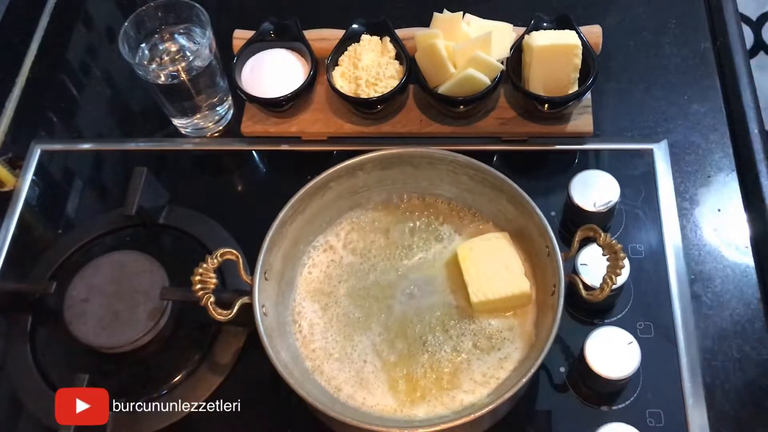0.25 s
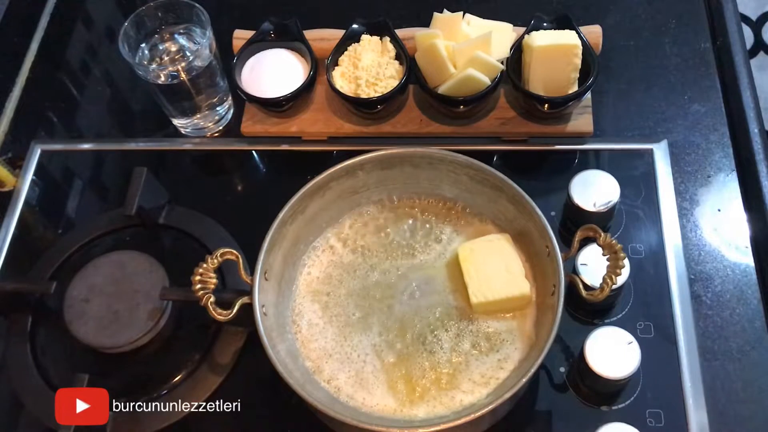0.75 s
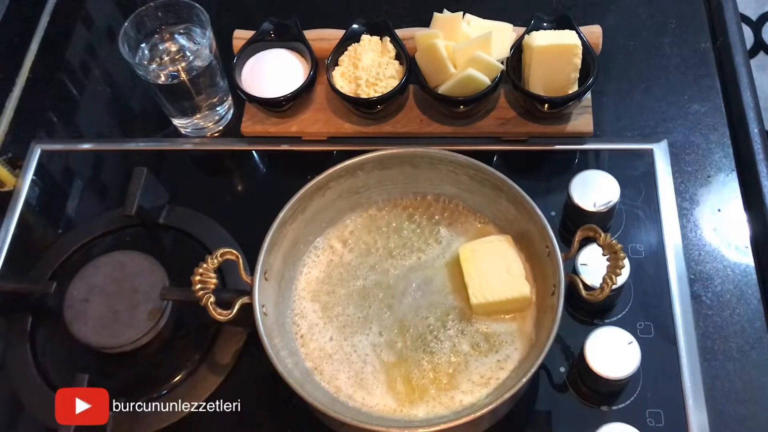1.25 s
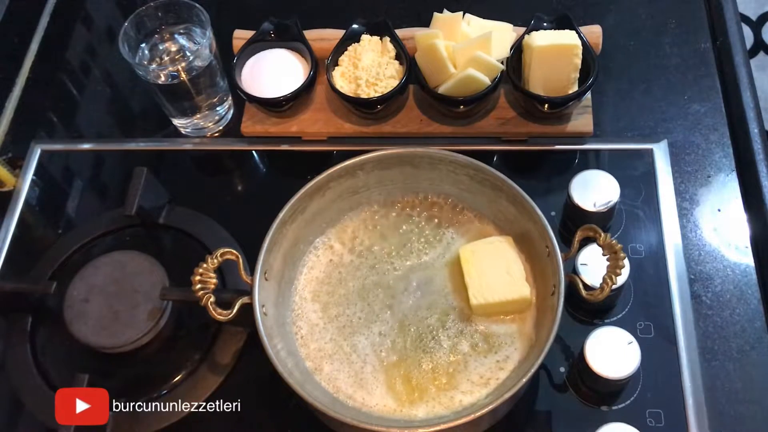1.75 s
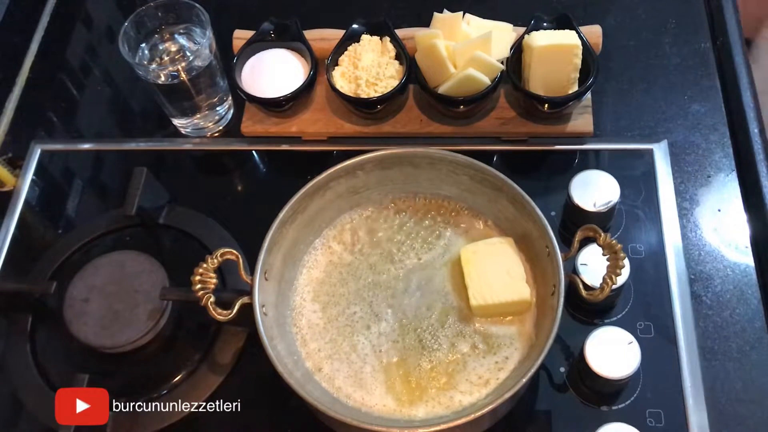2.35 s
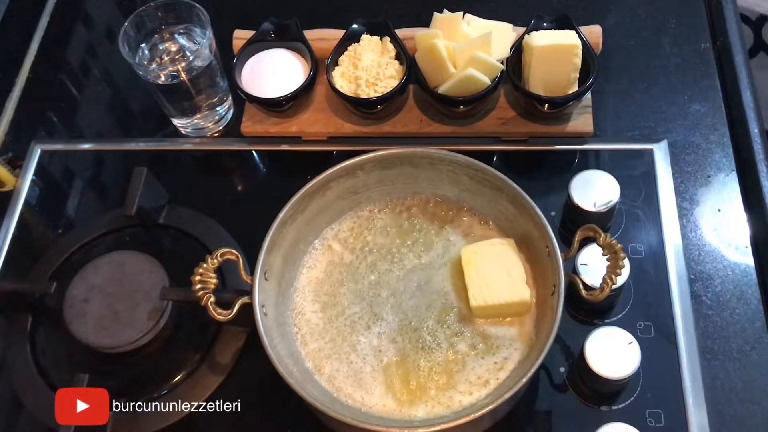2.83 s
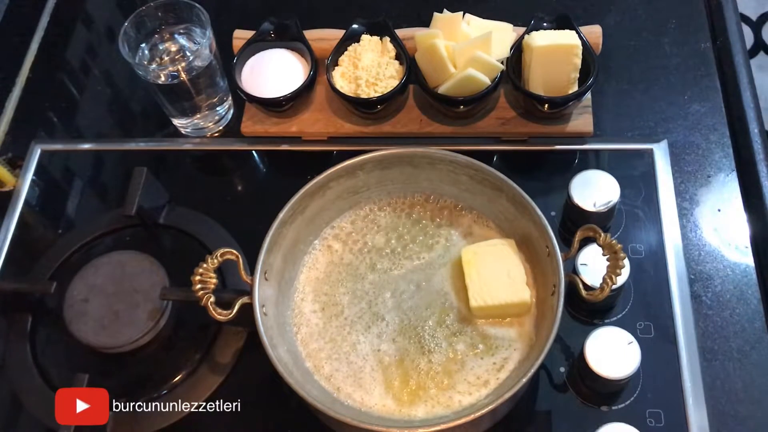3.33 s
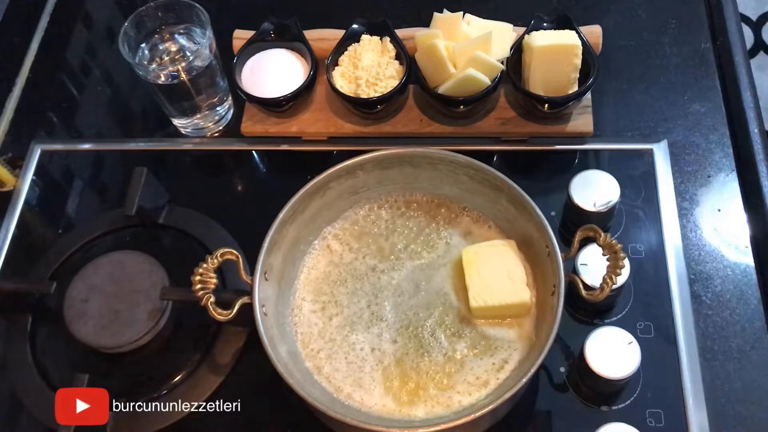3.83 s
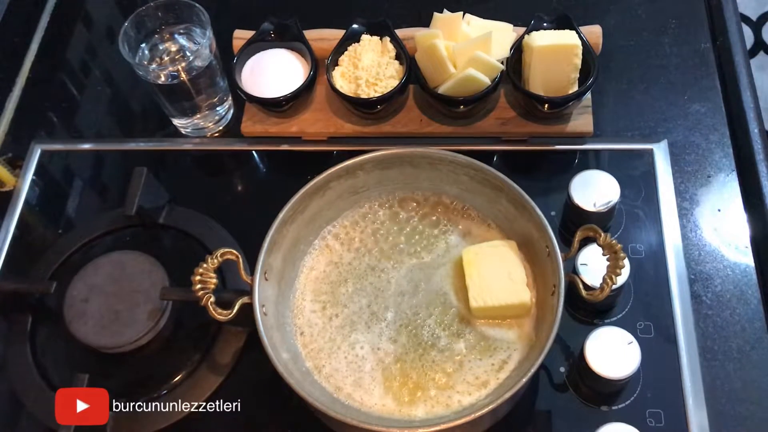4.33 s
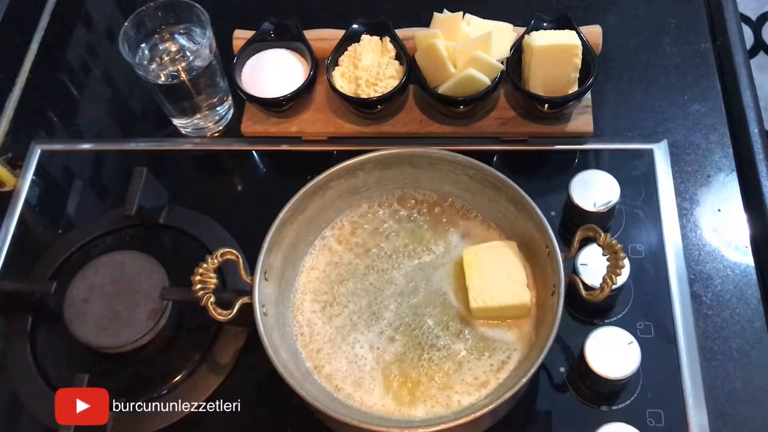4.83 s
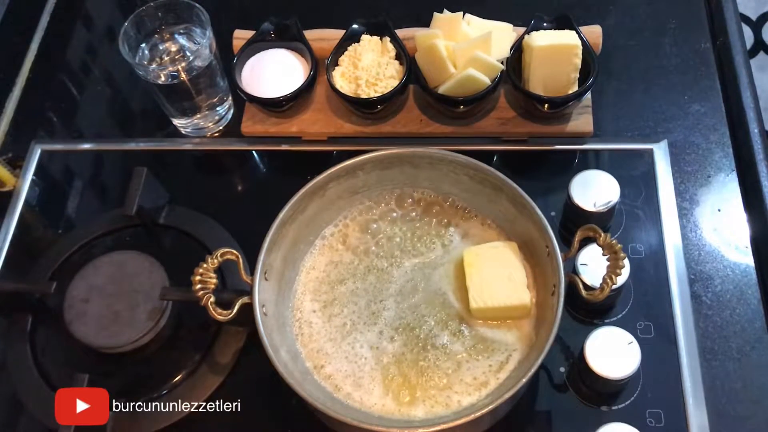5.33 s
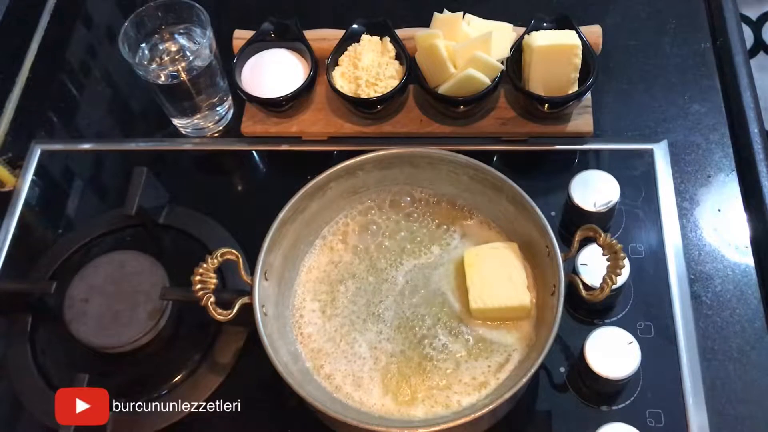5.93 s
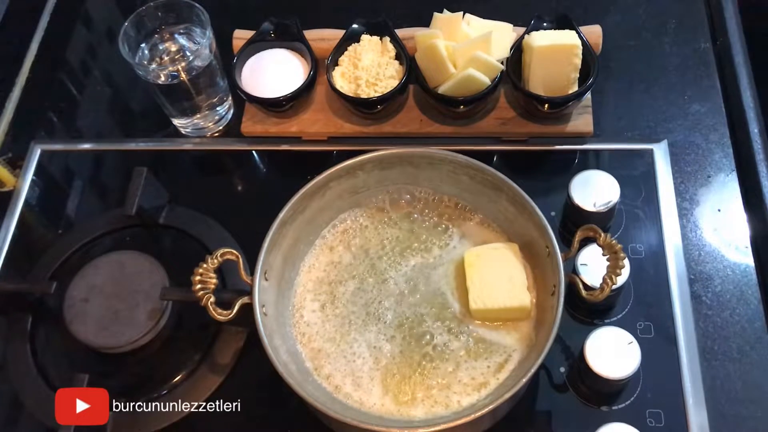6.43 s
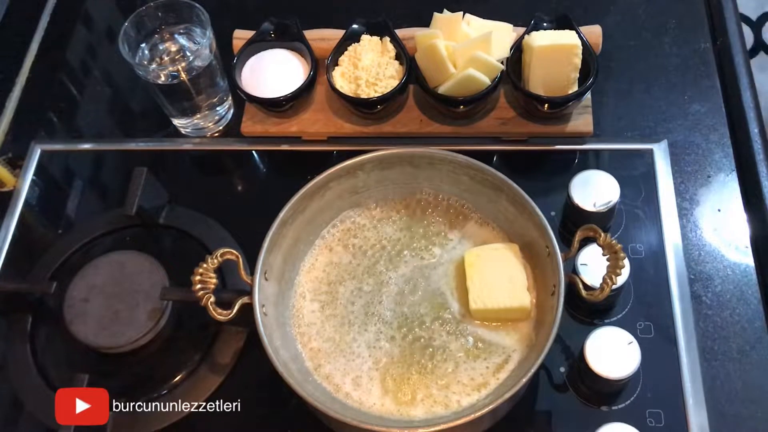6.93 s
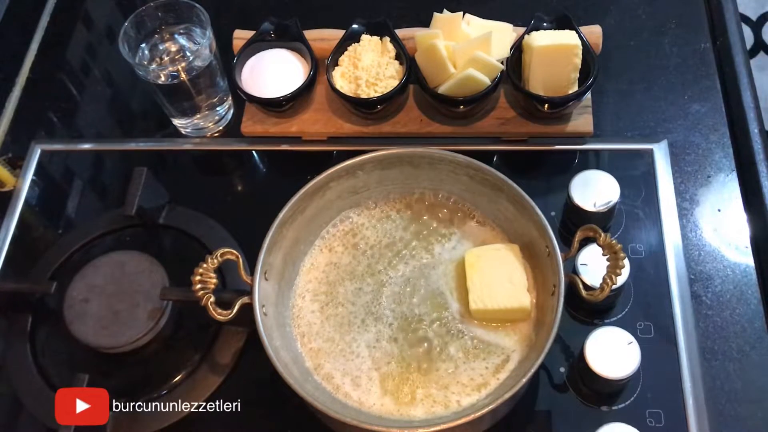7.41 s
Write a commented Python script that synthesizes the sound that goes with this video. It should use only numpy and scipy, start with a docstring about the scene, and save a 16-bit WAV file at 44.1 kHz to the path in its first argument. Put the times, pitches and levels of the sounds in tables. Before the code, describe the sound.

Butter sizzles close by in a metal pan for the whole stretch of nearly eight seconds: a fine, high fizz of tiny bubbles, with sharp, irregular pops. Beneath it the stove gives a steady low hum and a soft rush of air. Right at the start a drawer is pulled with a thud and two clacks. It rumbles on its rollers, with lighter clacks just after one second, then fades as it coasts. A faint wooden bump follows around 2.3 seconds and another at 4. At 4.4 seconds the drawer is knocked shut with a deep thud and a clatter of contents, the loudest moment, followed by a smaller knock at 4.8. Short spits of steam come now and then from two seconds on, more often between five and seven and a half. The kitchen adds only a faint echo.

```python
"""Butter sizzles in a metal pan on a kitchen hob: a fizz of countless tiny bubbles bursting.
Under it the stove hums with a soft rush of air. Right at the start, something like a drawer is
pulled with a clatter and a thud, and rolls out; later it is knocked shut. All along, larger bubbles
of water burst in the fat with sharp pops, and now and then steam squirts out in a short spit."""
import sys
import numpy as np
from scipy import signal
from scipy.fft import rfft, irfft
from scipy.io import wavfile

SR = 44100
rng = np.random.default_rng(int(sys.argv[2]) if len(sys.argv) > 2 else 0)


def file_out(sig):
    """Save sig as 16-bit WAV at sys.argv[1]."""
    # one column per channel
    cols = np.atleast_2d(sig).T
    # limit, then scale
    lim = np.clip(cols, -1, 1)
    pcm = np.round(lim * 32767).astype(np.int16)
    wavfile.write(sys.argv[1], SR, pcm)


N = 338247   # samples, about 7.7 seconds


def from_db(db):
    """Turn decibels into a number to multiply by."""
    return 10 ** (np.asarray(db) / 20)


def rms_one(x):
    """Scale a sound so that its average strength (rms) is 1."""
    return x / np.sqrt(np.mean(x ** 2) + 1e-20)


def add(out, start_s, sound):
    """Mix a sound into out, beginning at start_s."""
    i = int(np.clip(round(start_s * SR), 0, N - 1))
    out[i:i + len(sound)] += sound[:N - i]


def drift(rate_hz):
    """A smooth random wobble of typical size 1; a higher rate wobbles faster."""
    step, warm_up = 40, 2000
    r = np.exp(-2 * np.pi * rate_hz * step / SR)
    noise = rng.standard_normal(N // step + warm_up + 2)
    slow = signal.lfilter([1], [1, -2 * r, r * r], noise)[warm_up:]
    return np.interp(np.arange(N) / step, np.arange(len(slow)), rms_one(slow))


def colour(x, tone):
    """Shape a sound's lows and highs along (pitch_hz, level_db) points, then scale it to rms 1."""
    size = 8192
    hz, db = np.transpose(tone)
    grid_hz = np.maximum(np.arange(size // 2 + 1) * SR / size, 1)
    gains = from_db(np.interp(np.log(grid_hz), np.log(hz), db))
    # a minimum-phase filter: it rings after a click, never before
    cepstrum = irfft(np.log(gains))
    response = irfft(np.exp(rfft(2 * cepstrum[:size // 2], size)))
    return rms_one(signal.fftconvolve(x, response)[:N])


def keep_band(x, hz, side, order=2):
    """Keep the "low" or the "high" side of hz."""
    return signal.sosfilt(signal.butter(order, hz, side, fs=SR, output="sos"), x)


def resonate(x, hz, width_hz):
    """Make a sound ring at one pitch; a narrower width rings longer."""
    r = np.exp(-np.pi * width_hz / SR)
    feedback = [1, -2 * r * np.cos(2 * np.pi * hz / SR), r * r]
    return signal.lfilter(np.array([1, 0, -1]) * (1 - r * r) / 2, feedback, x + 1e-18)


def random_clicks(per_s, spread_db, max_spreads):
    """Clicks at random moments, many small and few large."""
    sizes = from_db(spread_db * np.minimum(rng.exponential(1, N), max_spreads))
    return (rng.random(N) < per_s / SR) * sizes * rng.choice([-1, 1], N)


# How lively the foam is as time passes: time_s, boost_db
FOAM_LIVELINESS = [(0, 3), (.5, 2), (1.5, -0.6), (2.2, 0), (4.7, -0.5), (5.7, -.3), (6.3, -0.5),
                   (7.67, 1.8)]


def liveliness_db(time_s):
    """How hard the butter bubbles; it lifts or lowers the fizz and the small pops."""
    return np.interp(time_s, *np.transpose(FOAM_LIVELINESS))


# Tone of the fizz in the pan, also used for the droplets of a spit: pitch_hz, level_db
FIZZ_TONE = [(500, -23.5), (1200, -2.5), (2700, -7.5), (3400, -4.5), (4350, -0.5), (4800, -7.5),
             (5400, -2.5), (6300, -0.5), (7500, -6), (9000, -2.5), (10400, -11.5), (12300, -7.5),
             (15500, -23)]


def fizz(level_db=-56.5, bubble_db=-1.0, sharpness=9):
    """Countless tiny bubble skins snap in flurries; some small bubbles ring, each at its own pitch."""
    flurry = from_db(4.0 * drift(14))
    snaps = random_clicks(per_s=3500 * flurry, spread_db=6.0, max_spreads=5.4)
    clicks = random_clicks(per_s=600 * flurry, spread_db=9.0, max_spreads=2.99)
    pitches_hz = np.geomspace(4200, 15000, 40)
    choice = rng.integers(0, len(pitches_hz), N)
    bubbles = sum(resonate(clicks * (choice == k), hz, hz / sharpness)
                  for k, hz in enumerate(pitches_hz))
    foam = colour(from_db(bubble_db) * rms_one(bubbles) + rms_one(snaps), FIZZ_TONE)
    return foam * from_db(level_db + liveliness_db(np.arange(N) / SR))


# The notes in the stove's hum: pitch_hz, level_db, waver_db
STOVE_HUM = [(99.56, -48.5, 1.5), (406, -89, 1), (542, -68, 0.2), (919, -81, -2)]
# Tone of the air rushing at the stove: pitch_hz, level_db
AIR_TONE = [(25, -24.5), (55, 3.5), (110, -1), (170, -9.5), (240, -16.5), (330, -15.5), (460, -21.5),
            (600, -21.5), (740, -27.5), (1150, -21), (1700, -25.5), (2080, -15), (2900, -26.5),
            (15000, -30.5)]


def stove(air_db=-53.5):
    """Mains electricity hums and a fan whines faintly over a steady rush of air."""
    t = np.arange(N) / SR
    hum = sum(np.sqrt(2) * from_db(level_db + waver_db * drift(1)) * np.sin(2 * np.pi * pitch_hz * t)
              for pitch_hz, level_db, waver_db in STOVE_HUM)
    air = keep_band(colour(rng.standard_normal(N), AIR_TONE), 19, "high")
    return hum + from_db(air_db) * air


# Tone of the drawer's rollers on their runners: pitch_hz, level_db
ROLLER_TONE = [(60, -24.5), (140, 4), (210, -9.5), (300, 2.5), (380, -11.5), (520, -5.5), (720, -17.5),
               (900, -8.5), (1200, -9), (1600, -19.5), (2300, -19), (4000, -31), (10000, -54)]


def drawer_rollers(level_db=-49, pull_until_s=1.21, fade_db_per_s=17.5):
    """Rollers rumble evenly while the drawer is pulled, then fade as it coasts to rest."""
    coasting_s = np.maximum(np.arange(N) / SR - pull_until_s, 0)
    rumble = colour(rng.standard_normal(N), ROLLER_TONE)
    return from_db(level_db - fade_db_per_s * coasting_s) * rumble


def knock(noise, start_s, level_db, rise_s, fade_s):
    """Half a second of noise that swells quickly and dies away, falling 60 dB in fade_s."""
    t = np.arange(SR // 2) / SR
    piece = noise[int(start_s * SR):][:len(t)]
    return piece * np.minimum(t / rise_s, 1) * from_db(level_db - 60 * t / fade_s)


# Sharp clacks of the things in the drawer: start_s, level_db, rise_s, fade_s, pitch_hz
DRAWER_CLACKS = [(0.033, -30.5, 0.0054, 0.24, 4900), (0.309, -30, 0.0061, 0.25, 3940),
                 (1.108, -44, 0.002, 0.17, 1110), (1.288, -37.5, 0.00095, 0.18, 1290),
                 (4.329, -45, 0.0047, 0.34, 835), (4.333, -36, 0.0055, 0.42, 4170),
                 (4.407, -32, 0.0056, 0.18, 5100), (4.412, -46, 0.0029, 0.7, 1370),
                 (4.428, -38, 0.01, 0.42, 3820), (4.759, -41, 0.0012, 0.35, 4270)]
# Tone of a clack: pitch_hz, level_db
CLACK_TONE = [(100, 8.5), (280, -16), (450, 3), (800, 2), (1300, -0.5), (2200, 0.5), (3000, -2.5),
              (3900, -2.5), (5000, -6.5), (6200, -0.5), (7500, -5), (10000, -3.5), (15500, -12)]
# Soft, dull bumps against the wood: start_s, level_db, rise_s, fade_s, pitch_hz
WOOD_BUMPS = [(0.037, -33, 0.03, 0.39, 350), (2.315, -42.5, 0.026, 1, 203), (4.0, -49, 0.01, 0.36, 453),
              (4.405, -38.5, 0.0044, 0.36, 290), (4.761, -45.5, 0.0045, 0.25, 480)]
# Tone of a bump: pitch_hz, level_db
BUMP_TONE = [(60, -4), (130, 15), (195, -2.5), (260, -6.5), (340, -1.5), (420, -12), (600, -11.5),
             (1200, -29), (4000, -16)]


def drawer_knocks(noise_db=-4.0, ring_db=-5.0, ring_width=0.45, treble_hz=8000, treble_life=0.56):
    """When the drawer jolts, its contents clatter and the wood bumps, each a short blur of noise."""
    out = np.zeros(N)
    for hits, tone in ((DRAWER_CLACKS, CLACK_TONE), (WOOD_BUMPS, BUMP_TONE)):
        noise = colour(rng.standard_normal(N), tone)
        for start_s, level_db, rise_s, fade_s, pitch_hz in hits:
            ring = rms_one(resonate(noise, pitch_hz, ring_width * pitch_hz))
            hit = from_db(noise_db) * noise + from_db(ring_db) * ring
            for side, life in (("low", 1), ("high", treble_life)):   # the treble dies sooner
                band = keep_band(hit, treble_hz, side, order=3)
                add(out, start_s, knock(band, start_s, level_db, rise_s, fade_s * life))
    return out


# Thuds on the cabinet: start_s, level_db, contact_s
CABINET_THUDS = [(0.039, -20.5, 0.0076), (0.321, -35, 0.0039), (3.973, -34.5, 0.0092), (4.012, -29, 0.0075),
                 (4.406, -6, 0.0038), (4.461, -21, 0.0074), (4.767, -23, 0.0073), (4.805, -34, 0.0063),
                 (6.464, -29.5, 0.021)]
# The low notes its panels ring at: pitch_hz, level_db, fade_s (time to fall 60 dB)
PANEL_NOTES = [(49.8, -8.5, 0.47), (59, 12.5, 0.13), (75.1, 5.5, 0.26), (111.6, -0.5, 0.23),
               (134.5, -16, 0.57), (196, -24, 0.26), (262, -14.5, 0.12), (322, -22, 0.17)]


def cabinet_thuds(swell_s=0.028):
    """Each thud swells through the panels; a longer contact leaves only the lowest notes."""
    out, t = np.zeros(N), np.arange(SR // 2) / SR
    panels = sum(from_db(level_db - 60 * t / fade_s) * np.sin(2 * np.pi * pitch_hz * t)
                 for pitch_hz, level_db, fade_s in PANEL_NOTES)
    panels *= 1 - np.exp(-t / swell_s)
    for start_s, level_db, contact_s in CABINET_THUDS:
        push = np.sin(np.pi * np.minimum(t / contact_s, 1)) ** 2
        add(out, start_s, from_db(level_db) * signal.fftconvolve(panels, push / push.sum()))
    return keep_band(out, 45.0, "high", order=3)


def small_pops(per_s=14):
    """Small bubbles burst at random, each with its own size, pitch and snap; rows as in LOUD_POPS."""
    wait, size, pitch, snap = rng.uniform(-1, 1, (200, 4)).T
    start_s = np.cumsum(-np.log((1 - wait) / 2)) / per_s
    level_db = -33 + liveliness_db(start_s) + 3.5 * size
    pitch_hz = 8200 * 2 ** (0.69 * pitch)   # up to 0.69 octaves either way
    snap_db = -45 + 9 * snap
    rows = np.transpose([start_s, level_db, pitch_hz, snap_db])
    return rows[start_s < N / SR]


# The loudest bubbles of water bursting in the fat: start_s, level_db, pitch_hz, snap_db
LOUD_POPS = [(0.242, -23.5, 6300, -45), (0.53, -29, 4680, -32), (0.616, -20.5, 11700, -50),
             (0.6415, -27.5, 6570, -30.5), (0.838, -26, 6700, -46), (0.8653, -22.5, 6800, -43),
             (1.264, -20.5, 5260, -44), (1.867, -48, 12100, -24.5), (2.09, -21, 5700, -70),
             (2.115, -23, 8650, -54), (2.1714, -22, 5270, -59), (2.342, -29, 10100, -38),
             (2.531, -26, 6160, -55), (2.5425, -30, 5660, -33), (2.785, -24, 5530, -52),
             (2.8646, -27.5, 4500, -55), (3.185, -25.5, 8500, -54), (3.264, -30, 4410, -37),
             (3.291, -31, 6300, -33), (3.5402, -29, 14000, -52), (3.5537, -25, 6500, -48),
             (3.693, -25.5, 6310, -40), (3.7376, -21.5, 5100, -36), (4.0527, -35, 13500, -32),
             (4.1919, -24.5, 8700, -49), (4.5817, -18, 5700, -60), (4.76, -23.5, 4420, -60),
             (5.015, -20, 4240, -33), (5.104, -27, 4500, -38), (5.452, -39, 11000, -30),
             (5.642, -26.5, 5330, -52), (5.7279, -26.5, 5070, -52), (5.9963, -25, 6100, -57),
             (6.012, -22, 5700, -54), (6.0424, -25.5, 6200, -51), (6.1184, -25, 5770, -35),
             (6.1852, -23.5, 9450, -53), (6.2417, -24.5, 5960, -53), (6.3442, -25, 8900, -37),
             (6.404, -26, 7260, -46), (6.6749, -42, 11800, -31.5), (6.7999, -28, 7300, -53),
             (6.954, -22.5, 4450, -33), (6.998, -32, 8450, -34), (7.6047, -23, 6860, -35)]


def pops(ring_cycles=9, tail_cycles=36, ring_db=-3.0, tail_db=-13.0, snap_boost_db=9.5, echo_db=-7.0):
    """A bubble's skin snaps, the hollow rings briefly, and the hob echoes it a moment later."""
    out, t = np.zeros(N), np.arange(SR // 100) / SR
    snap = np.sin(2 * np.pi * 12500 * t) * from_db(-60 * t / .0005)
    bubbles = [*LOUD_POPS, *small_pops()]
    echo_delays_s = rng.uniform(.0027, .003, len(bubbles))
    for (start_s, level_db, pitch_hz, snap_db), delay_s in zip(bubbles, echo_delays_s):
        cycles = t * pitch_hz
        fade = from_db(ring_db - 60 * cycles / ring_cycles)
        fade += from_db(tail_db - 60 * cycles / tail_cycles)
        ring = from_db(level_db) * fade * np.sin(2 * np.pi * cycles)
        pop = keep_band(ring, 3340, "high") + from_db(snap_db + snap_boost_db) * snap
        add(out, start_s + .0006, pop)
        add(out, start_s + delay_s, from_db(echo_db) * pop)
    return out


# Spits of steam, each timed at its strongest moment: peak_s, level_db, pitch_hz
STEAM_SPITS = [(2.157, -46.5, 5500), (2.789, -50.5, 6020), (3.71, -46, 5960), (5.032, -45.5, 4630),
               (5.088, -47, 5430), (6.013, -52, 5500), (6.099, -44, 3840), (6.248, -52, 6400),
               (6.383, -47, 4950), (6.951, -45, 4750), (7.213, -47, 5740), (7.291, -44.5, 5270),
               (7.31, -47.5, 6400), (7.336, -51.5, 4820)]


def steam_spits(half_length_s=.0095, fall_octaves=0.26, rasp_hz=540, spatter_db=-6.0):
    """Steam squirts through the fat and throws droplets; the gap widens, so its rough whistle falls."""
    out = np.zeros(N)
    rasp = keep_band(rng.standard_normal(N) + 1j * rng.standard_normal(N), rasp_hz, "low")
    droplets = colour(random_clicks(per_s=3000, spread_db=5.0, max_spreads=3.6), FIZZ_TONE)
    for peak_s, level_db, pitch_hz in STEAM_SPITS:
        span = np.arange(int((peak_s - 2 * half_length_s) * SR), int((peak_s + 4 * half_length_s) * SR))
        age = (span / SR - peak_s) / half_length_s   # in half lengths, 0 at the peak
        phase = 2 * np.pi * np.cumsum(pitch_hz * 2 ** (-fall_octaves * age)) / SR
        rough_note = np.real(rasp[span] * np.exp(1j * phase))   # lifts the rasp up to the pitch
        whistle = np.exp(-age * age) * rms_one(rough_note)
        spatter = np.exp(-.5 * (age - 1) ** 2) * droplets[span]   # the droplets land a little later
        out[span] += from_db(level_db) * (whistle + from_db(spatter_db) * spatter)
    return out


def kitchen_echoes(x, near_db=-5.5, near_fade_s=0.051, room_db=-14, room_fade_s=0.4):
    """Sound bounces quickly off the pan wall and hob, then lingers faintly in the room."""
    t = np.arange(SR // 2) / SR
    out, wander = x, np.pi * drift(33.3)
    # bubbles burst all over the pan, so the pattern of echoes keeps changing
    for share in (np.cos(wander), np.sin(wander)):
        for level_db, fade_s in ((near_db, near_fade_s), (room_db, room_fade_s)):
            echoes = rng.standard_normal(len(t)) * from_db(-60 * t / fade_s) * (t > .0006)
            echoes /= np.linalg.norm(echoes)
            out = out + from_db(level_db) * signal.fftconvolve(x * share, echoes)[:N]
    return out


def volume_dip(x, threshold_db=-24, strength=0.2, release_db_per_s=45, attack_s=0.054):
    """A loud sound turns the volume down for a moment."""
    recovery_db = release_db_per_s * np.arange(N) / SR
    over_db = np.maximum(20 * np.log10(np.abs(x) + 1e-9) - threshold_db, 0)
    held_db = np.maximum.accumulate(over_db + recovery_db, axis=-1) - recovery_db
    r = np.exp(-1 / (attack_s * SR))
    smooth_db = signal.lfilter([1 - r], [1, -r], held_db)
    return x * from_db(-strength * smooth_db)


def scene():
    """The sizzling pan with its echoes, the drawer and the stove, mixed into one channel."""
    pan = kitchen_echoes(fizz() + pops() + steam_spits())
    drawer = drawer_rollers() + drawer_knocks() + cabinet_thuds()
    return np.array([pan + drawer + stove()])


def record(dry):
    """The volume dips at loud knocks, and the treble above 16000 Hz is cut steeply."""
    treble_cut = signal.ellip(10, .1, 80, 16000, fs=SR, output="sos")
    return signal.sosfilt(treble_cut, volume_dip(dry))


dry = scene()
out = record(dry)
file_out(out)
```